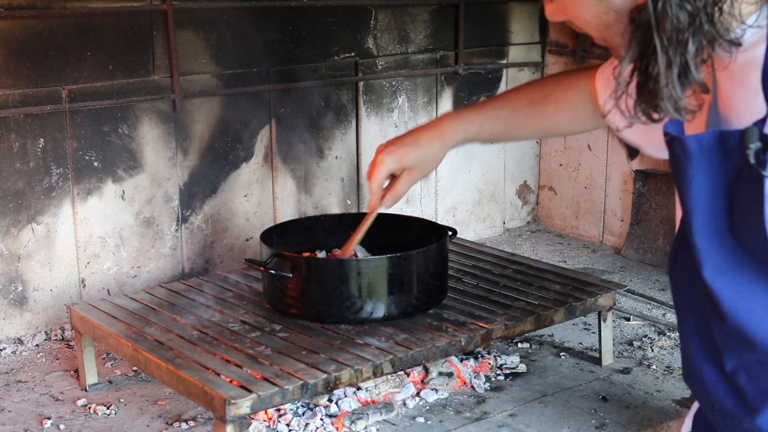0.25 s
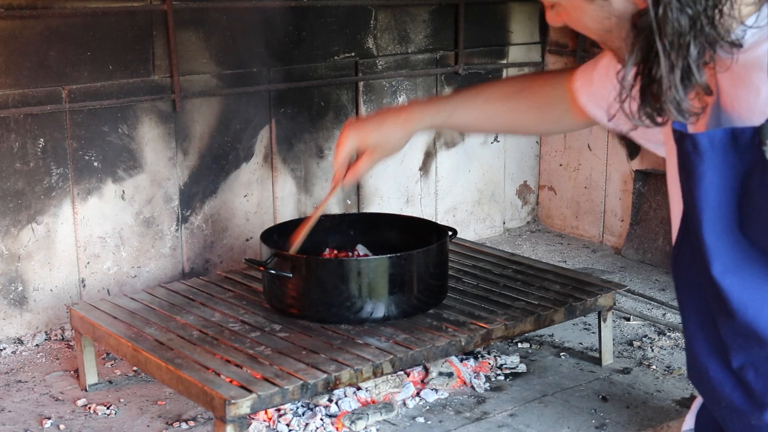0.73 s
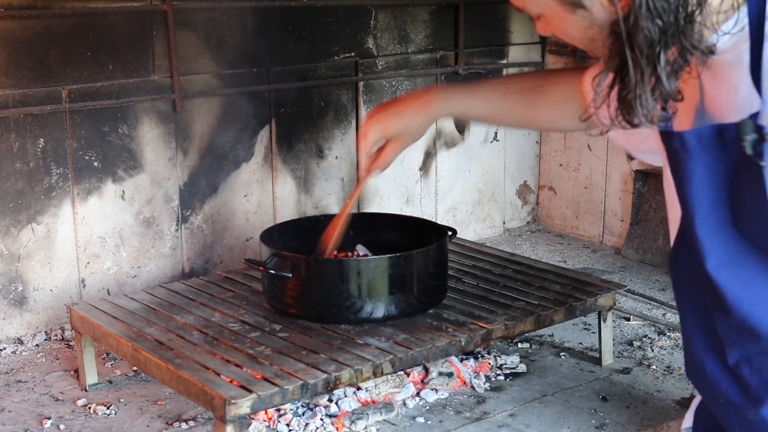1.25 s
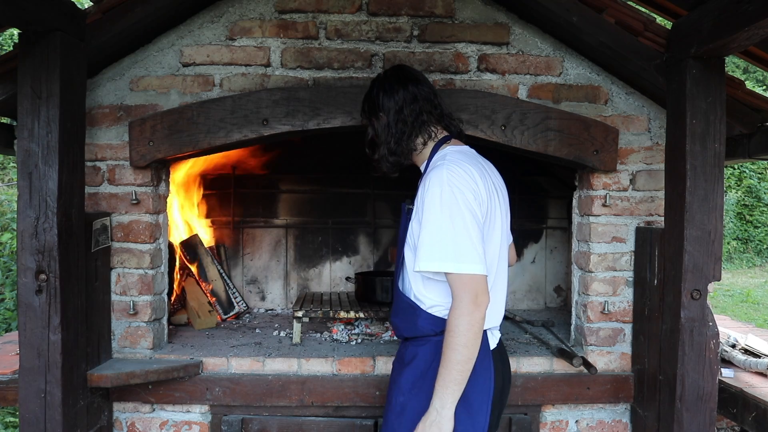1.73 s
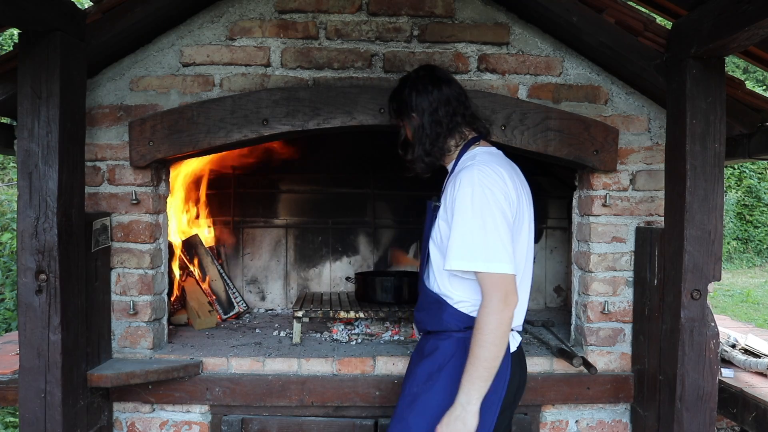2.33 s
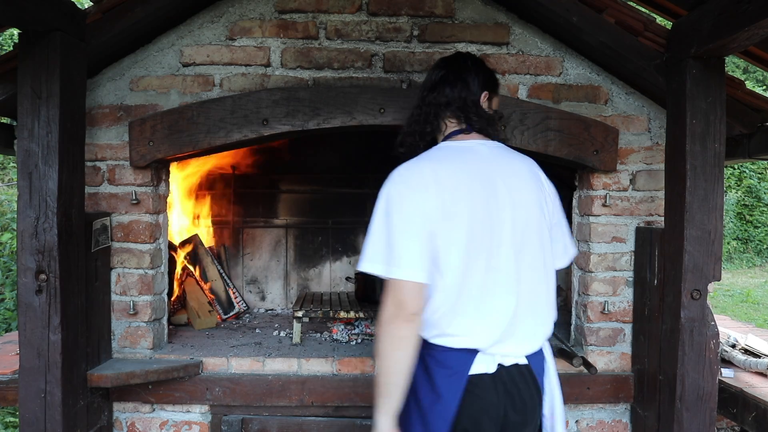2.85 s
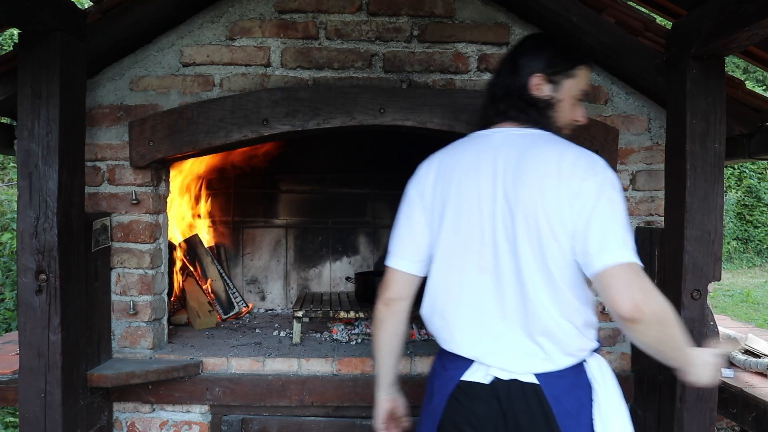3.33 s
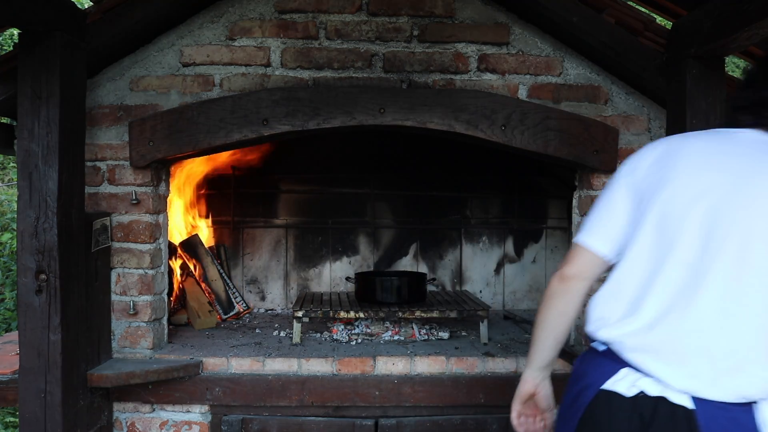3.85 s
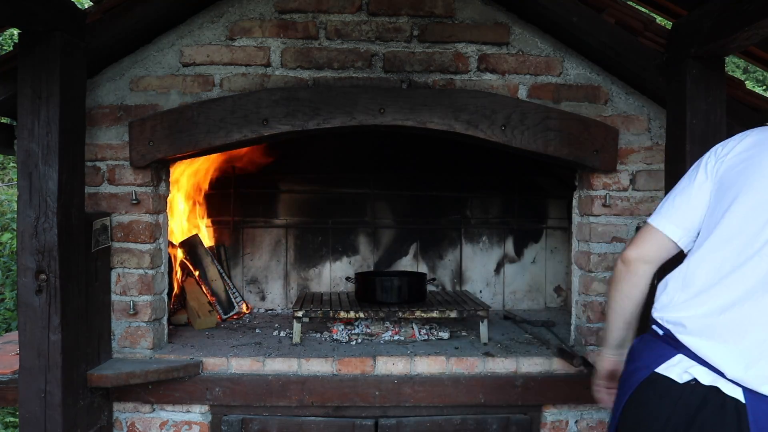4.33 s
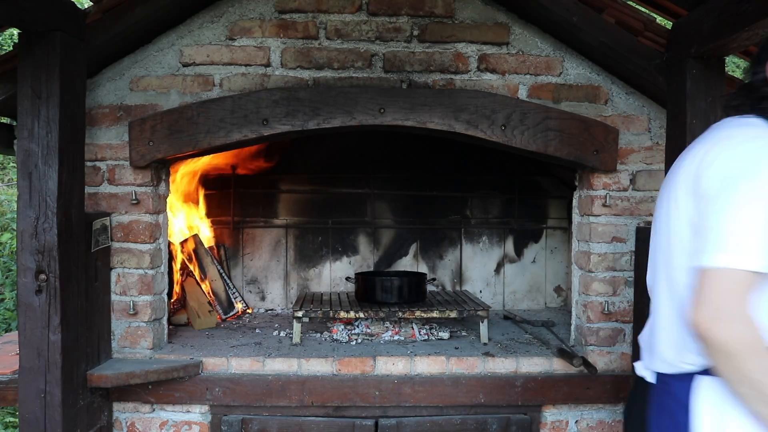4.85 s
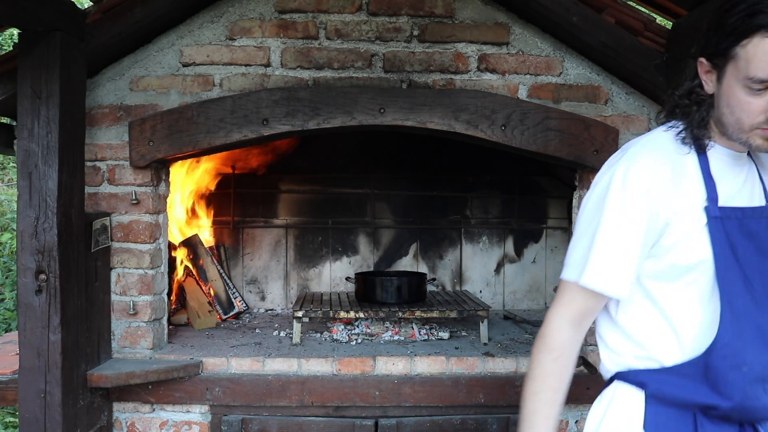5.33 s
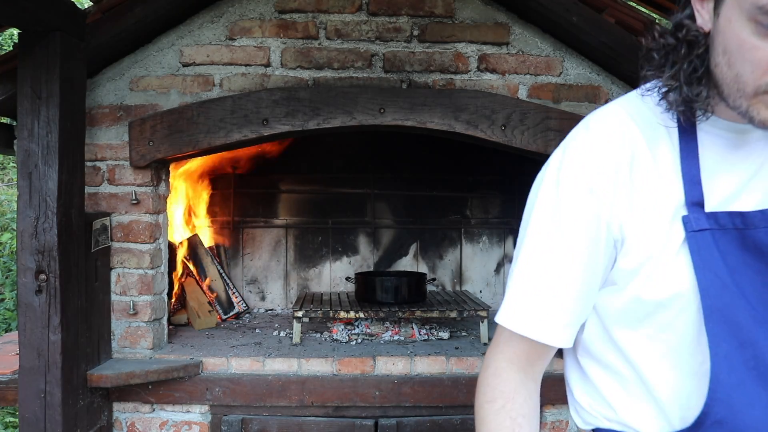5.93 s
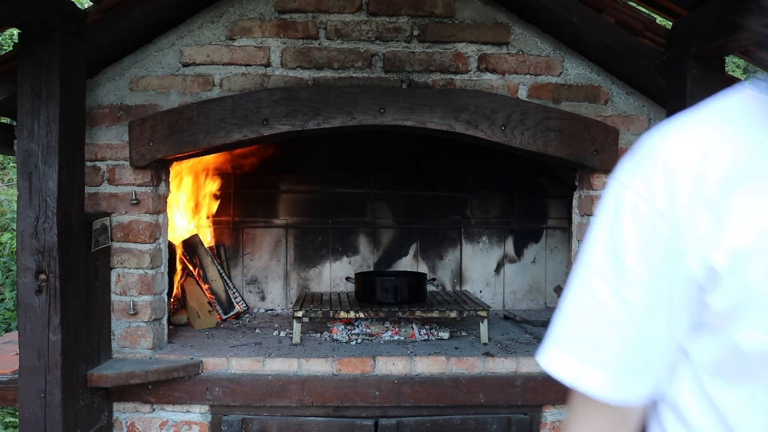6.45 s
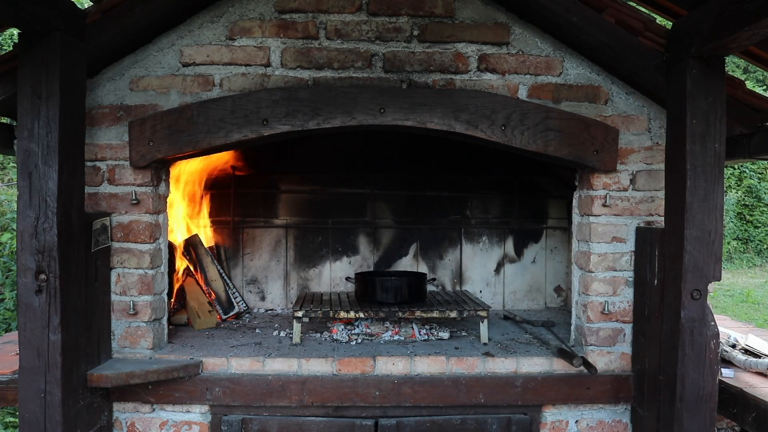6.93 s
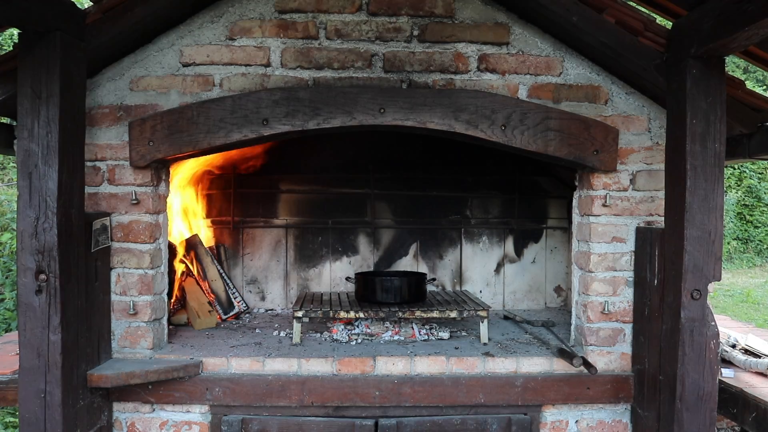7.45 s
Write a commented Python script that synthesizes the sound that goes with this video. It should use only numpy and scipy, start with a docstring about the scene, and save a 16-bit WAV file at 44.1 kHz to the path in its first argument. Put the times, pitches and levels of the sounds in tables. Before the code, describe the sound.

Outdoors at a brick hearth, a quiet wood fire runs throughout: low fluttering rumble, thin ember hiss, fine crackle leaning right. A wooden spoon straight ahead knocks a steel pot at 0.36, 0.68 and 1.0 seconds, hollow with short metallic ringing, each louder and brighter, each with a tiny rebound; a faint dull touch follows at 1.2. Four short rasping scrapes come at 1.7, 2.0, 2.3 and 2.65, with the grate shuddering faintly. Bright snaps stand out near 0.95, 2.15, 3.4 and 7.05, and a steam spit at 3.6. From 3.4 onward dull irregular knocks sound nearby, clearest at 3.6, 6.1 and 6.85. A bird pipes faintly at 0.6, then at 3.9, 4.3 and 4.8, with a slight echo; a tiny chirp comes at 4.6. From 6.1 to the end another bird sings high scoops, a fuzzy note and falling notes.

```python
"""Spoon on a steel pot, outdoor hearth

Straight ahead, a wooden spoon knocks three times on the wall of a steel pot on an iron grate, with a faint
fourth touch, then scrapes four strokes along it. Each blow rings resonant modes; each stroke drives them with
sines and noise. To the right leans a wood fire of filtered noise in a brick hearth, with snaps, spits of steam
and one faint narrow chirp as noise puffs. Dull knocks sound nearby; in the garden one bird pipes and another
sings, as gliding sines."""
import sys
import numpy as np
from scipy import signal
from scipy.fft import rfft, irfft, next_fast_len
from scipy.io import wavfile
from scipy.ndimage import uniform_filter1d, map_coordinates

SR = 44100
rng = np.random.default_rng(int(sys.argv[2]) if len(sys.argv) > 2 else 0)


def store_pcm(level_fs):
    """Save levels as 16-bit WAV."""
    pcm = np.round(np.clip(level_fs, -1, 1) * 32767).astype(np.int16)
    wavfile.write(sys.argv[1], SR, np.atleast_2d(pcm).T)


N = 338639


def amp(db):
    """Gain of a level in dB."""
    return 10 ** (np.asarray(db) / 20)


def unit(x):
    """Scales to rms 1."""
    return x / np.sqrt(np.mean(x ** 2) + 1e-20)


def along(points, hz):
    """Interpolates (Hz, value) points on a log frequency axis."""
    f, v = np.transpose(points)
    return np.interp(np.log(hz + 1), np.log(f + 1), v)


def curves(rows):
    """One value per sample for each column after the time."""
    s, *columns = np.transpose(rows)
    return [np.interp(np.arange(N) / SR, s, column) for column in columns]


def since(s):
    """Seconds since a moment, for every sample."""
    return np.arange(N) / SR - s


def wobble(rate):
    """A smooth random curve with rate knots a second."""
    knots = rng.standard_normal(int(N * rate / SR) + 4)
    return map_coordinates(knots, [np.arange(N) * rate / SR])


def arch(u, sharp):
    """A swell from 0 back to 0 while u runs from 0 to 1."""
    return np.sin(np.pi * np.clip(u, 0, 1)) ** sharp * (u > 0) * (u < 1)


def hump(hz, centre_hz, octaves):
    """A bell-shaped band on a log frequency axis."""
    return np.exp(-.5 * (np.log2((hz + 1) / centre_hz) / octaves) ** 2)


def filtered(x, response):
    """Multiplies the spectrum of x by a response, which may be complex."""
    m = next_fast_len(x.shape[-1] + SR // 2)
    return irfft(rfft(x, m) * response(np.fft.rfftfreq(m, 1 / SR)), m)[..., :x.shape[-1]]


def add(track, s, sound):
    """Lays a sound into a track at s seconds."""
    i = round(s * SR)
    track[..., i:i + sound.shape[-1]] += sound[..., :track.shape[-1] - i]


def sides(pan_db):
    """Left and right gains for a left minus right level."""
    return amp([pan_db / 2, -pan_db / 2])


def whistle(hz, db):
    """A sine of the given rms level along a pitch curve."""
    return np.sqrt(2) * amp(db) * np.sin(2 * np.pi * np.cumsum(hz) / SR)


def patchy(depth_db, channels):
    """White noise with patches of random gain in time and frequency, shared by the channels."""
    z = signal.stft(rng.standard_normal((channels, N)), nperseg=512)[2]
    field = uniform_filter1d(rng.standard_normal(z.shape[1:]), 6, 0)
    field = uniform_filter1d(field, 8, 1)
    return signal.istft(z * amp(depth_db * unit(field)), nperseg=512)[1][:, :N]


def puff(out, s, db, band, shape, pan_db, alike):
    """Adds a short noise in a band under an envelope, from its own side; the microphone dulls the top."""
    dulled = lambda hz: band(hz) / (1 + (hz / 14200) ** 8)
    common, left, right = filtered(shape * rng.standard_normal((3, len(shape))), dulled)
    pair = alike * common + (1 - alike) * np.array([left, right])
    pair *= np.linalg.norm(shape) / np.linalg.norm(pair, axis=1, keepdims=True)
    trim_db = -8.0  # every listed puff level is lowered by this
    add(out, s, amp(db + trim_db) * sides(pan_db)[:, None] * pair)


def bursts(rows, rise_s, t60, alike):
    """Sharp puffs with two coloured bands: a click at the front, then a short fray."""
    out, t = np.zeros((2, N)), np.arange(SR // 10) / SR
    click, fray = amp(-60 * t / 0.008), 0.48 * amp(-60 * t / t60)
    shape = np.minimum(t / rise_s, 1) * (click + fray)
    for s, db, centre_hz, pan_db, octaves, second_hz, second_db in rows:
        band = lambda hz: hump(hz, centre_hz, octaves) + amp(second_db) * hump(hz, second_hz, octaves)
        puff(out, s, db, band, shape, pan_db, alike)
    return out


def swells(rows, low_hz, alike):
    """Band noises that swell and are soon spent, with nothing below low_hz."""
    out, t = np.zeros((2, N)), np.arange(SR // 5) / SR
    for s, db, centre_hz, spent_s, pan_db, octaves, rise_s in rows:
        shape = np.sin(np.pi / 2 * np.minimum(t / rise_s, 1)) * amp(-60 * (t / spent_s) ** 2)
        band = lambda hz: hump(hz, centre_hz, octaves) * (hz > low_hz)
        puff(out, s, db, band, shape, pan_db, alike)
    return out


# the brick vault's decay: f/Hz, t60/s
VAULT_DECAY = [(300, 0.19), (3000, 0.18), (12000, 0.072)]


def hearth(x):
    """The brick vault's short tail: decaying noise in which each frequency dies at its own speed."""
    hz, t, z = signal.stft(rng.standard_normal((2, SR // 4)), SR, nperseg=256)
    decay = amp(-60 * t / along(VAULT_DECAY, hz)[:, None])
    tail = signal.istft(z * decay, SR, nperseg=256)[1]
    return signal.fftconvolve(np.atleast_2d(x), tail / np.linalg.norm(tail[0]), axes=1)[:, :N]


# the fire's course: t/s, rumble level/dB, roar level/dB (before the flicker)
FIRE_LEVELS = [(0.0, -76, -68.5), (0.23, -64.5, -69.5), (0.58, -81.5, -69.5), (0.88, -68.5, -65.5),
               (1.22, -63.5, -66), (2.01, -74.5, -67.5), (2.61, -72.5, -68), (3.42, -79, -69.5),
               (4.06, -76, -69.5), (4.5, -79.5, -68.5), (7.68, -77.5, -68)]
# colours of flames and embers: f/Hz, relative level/dB per Hz
RUMBLE_COLOUR = [(12, -54), (20, -18.5), (48, 8), (65, 5.5), (86, -17.5), (100, -11), (130, -59),
                 (220, -120)]
ROAR_COLOUR = [(53, -29), (90, -2.5), (162, 1.5), (320, 0), (477, -7), (767, -13.5), (858, -14),
               (1340, -18), (2780, -24), (4000, -47), (5200, -71), (8800, -120)]
HISS_COLOUR = [(1470, -40), (2500, -8.5), (2790, -5), (3830, -6.5), (4100, -5.5), (4720, -8), (9460, -6),
               (12400, -16), (15900, -19)]
# stereo width of the fire bed: f/Hz, side minus mid level/dB
FIRE_WIDTH = [(60, -27.5), (110, -20), (200, -17.5), (380, -12.5), (700, -9.5), (1290, -4.5), (2380, -4.5),
              (4400, -3.5), (8120, -1), (15000, 0.5)]


def fire_bed():
    """Flames rumble and flutter in the bass, flaring together; embers hiss, wider in the treble."""
    def pair(colour, depth_db):
        mid_side = lambda hz: amp(along(colour, hz)) * np.array([np.ones_like(hz), amp(along(FIRE_WIDTH, hz))])
        mid, side = filtered(patchy(depth_db, channels=2), mid_side)
        return np.array([mid + side, mid - side]) / np.std(mid)

    rumble_db, roar_db = curves(FIRE_LEVELS)
    hiss_db = -79.5 - 0.31 * since(0)  # the embers cool, in dB per second
    flare = wobble(12)
    rumble = amp(rumble_db + 0.5 * flare + 0.32 * wobble(2.9)) * pair(RUMBLE_COLOUR, depth_db=3.0)
    roar = amp(roar_db + .9 * flare + 1.1 * wobble(22)) * pair(ROAR_COLOUR, depth_db=.8)
    hiss = amp(hiss_db + 1.2 * wobble(35)) * pair(HISS_COLOUR, depth_db=.5)
    return rumble + roar + hiss * sides(-1.5)[:, None]


# piping bird: t/s, length/s, f/Hz, level/dB before the droop, half-pitch undertone over the note/dB
PIPED_NOTES = [(0.565, 0.082, 1670, -70.5, -40), (3.867, 0.097, 1830, -63.5, -40),
               (4.308, 0.1, 1850, -65, -6.5), (4.778, 0.11, 1842, -62.5, -40)]


def piping_bird():
    """A bird pipes level sine notes that droop and fade at the end; a far wall returns them."""
    bend, bend_power, fade_db = .09, 3.5, 24  # fall as a share of pitch; how late; level lost with it
    piper = np.zeros(N)
    for s, length, pitch_hz, db, under_db in PIPED_NOTES:
        u = since(s) / length
        droop = np.clip(u, 0, 1) ** bend_power
        hz = pitch_hz * (1 - bend * droop) + 15 * wobble(80)
        level_db = db - fade_db * droop + 2.4 * wobble(70)
        note = arch(u, sharp=0.38) * whistle(hz, level_db)
        undertone = arch(u, sharp=3) * whistle(hz / 2, db + under_db)
        piper += note + undertone
    return piper + amp(-12.5) * np.roll(piper, round(.075 * SR))  # the wall's echo after 75 ms


# sung notes: t/s, length/s, start f/Hz, middle f/Hz, end f/Hz, level/dB before the wobble
SUNG_NOTES = [(6.066, 0.13, 3930, 3590, 3990, -79), (6.342, 0.14, 3940, 3600, 4000, -74),
              (6.611, 0.19, 3910, 3120, 3960, -68.5), (6.916, 0.13, 5200, 5050, 5500, -79),
              (7.2, .045, 5200, 4950, 4650, -81), (7.277, 0.073, 4120, 3480, 2880, -72.5),
              (7.448, 0.11, 3600, 2900, 2260, -69.5)]
# one fuzzy note: t/s, length/s, f/Hz, level/dB
FUZZY_NOTE = [(6.765, .18, 2880, -76.5)]


def singing_bird():
    """A bird sings scoops and falls as smooth sine arcs, and one fuzzy note of narrow noise."""
    singer = np.zeros(N)
    for s, length, start_hz, middle_hz, end_hz, db in SUNG_NOTES:
        u = since(s) / length
        v = np.clip(u, 0, 1)
        bow_hz = middle_hz - (start_hz + end_hz) / 2
        hz = start_hz + (end_hz - start_hz) * v + bow_hz * np.sin(np.pi * v ** .85) ** 1.4
        singer += arch(u, sharp=.45) * whistle(hz + 30 * wobble(150), db + 4 * wobble(60))
    (s, length, fuzzy_hz, db), = FUZZY_NOTE
    narrow = unit(filtered(rng.standard_normal(N), lambda hz: hump(hz, fuzzy_hz, 0.052)))
    return singer + arch(since(s) / length, sharp=0.94) * amp(db) * narrow


# dull knocks nearby: t/s, level/dB before the puff trim, centre f/Hz, left minus right/dB,
# width/octaves, second centre f/Hz, second over first/dB
NEARBY_KNOCKS = [(3.434, -51, 514, 4, 0.39, 1340, -10), (3.634, -37.5, 875, -.6, 0.24, 1760, 2.5),
                 (3.9, -47.5, 362, -1.2, 0.7, 1810, -16.5), (4.45, -51, 487, -2.2, 0.44, 1440, -17),
                 (4.581, -50, 479, 1, 0.6, 1800, -19), (5.318, -50, 324, 0, 1.1, 2860, -36),
                 (5.505, -50, 463, -2, 0.7, 1470, -14), (5.56, -52.5, 870, -1.2, 0.21, 2460, -16),
                 (6.066, -42.5, 371, 1, 0.88, 1610, -38), (6.331, -47.5, 930, 5, 0.28, 2270, -3),
                 (6.607, -48.5, 358, -2, 0.52, 1280, -22), (6.852, -40, 301, 2, 1.32, 2890, -41),
                 (7.319, -51, 345, .1, 0.65, 1900, -8)]


def thuds():
    """Things knocked nearby: short low noise bursts in two bands."""
    return bursts(NEARBY_KNOCKS, rise_s=0.0015, t60=0.078, alike=0.9)


def crackle(count, floor_db, low_hz, top_hz, t60):
    """Many faint snaps at random moments, mostly to the right, a few of them larger."""
    when, size, pitch, low, pan = rng.random((count, 5)).T
    same = np.ones(count)
    start_s = when * (N / SR - .01)
    level_db = floor_db - 2.7 * np.log(size + 0.014)
    centre_hz, second_hz = top_hz * (.6 + .4 * pitch), low_hz * (1 + 1.5 * low)
    pan_db = -7 * pan + 1.5
    rows = np.transpose([start_s, level_db, centre_hz, pan_db, .3 * same, second_hz, -5 * same])
    return bursts(rows, 0.0006, t60, alike=0.67)


def embers():
    """Charcoal settles with duller ticks, scattered at random."""
    return crackle(count=45, floor_db=-63.5, low_hz=500, top_hz=4000, t60=0.088)


# louder snaps of burning wood: t/s, level/dB before the puff trim, centre f/Hz, left minus right/dB,
# width/octaves, second centre f/Hz, second over first/dB
LOUD_SNAPS = [(0.387, -51.5, 10000, -2, 0.31, 5800, 9), (0.5023, -61, 8730, -2.5, 0.23, 6730, 6),
              (0.6128, -53.5, 10300, -3, 0.22, 6600, 11), (0.7647, -52.5, 8120, 2, 0.25, 4250, 2),
              (0.7816, -49.5, 10900, -10, 0.37, 4400, -15), (0.794, -46.5, 14500, -14, 0.12, 10800, -5),
              (0.7437, -57, 10000, -6, 0.15, 4500, -6), (0.8879, -51, 8560, -2, 0.53, 2910, -2),
              (0.9453, -32, 10700, -14.5, 0.13, 6800, -20.5), (1.2126, -52.5, 8850, -4, 0.22, 4480, -6),
              (1.5319, -55, 9200, -4, 0.27, 6800, 5), (2.153, -30, 11200, -1.5, 0.11, 3560, -39),
              (2.5461, -50, 12100, -5, 0.24, 7010, -2), (2.5905, -52, 12200, -1.5, 0.27, 7050, -15),
              (3.0619, -56, 9230, -1, 0.3, 4740, -15), (3.3712, -32, 12640, -7, 0.074, 8530, -1.5),
              (3.3735, -42, 10500, -4, 0.25, 3360, 0), (3.523, -52.5, 8180, -2.5, 0.6, 5950, -6),
              (3.5433, -50, 13500, 7, 0.08, 11000, -7), (3.7299, -52.5, 13400, 0, 0.23, 6570, -11),
              (3.886, -50, 9000, -2.5, 0.47, 6190, -5), (4.0654, -51.5, 8700, -1, 0.42, 6490, -2),
              (4.686, -58, 9000, -1.5, 0.51, 6230, -6), (4.7177, -56, 12800, -1.5, 0.62, 3150, 4),
              (5.7119, -57.5, 9100, -8, 0.43, 6580, 2.5), (5.7384, -50, 9800, -2.5, 0.52, 3060, -5),
              (5.896, -52, 9100, -12, 0.58, 6410, -6), (5.9202, -46, 12600, -2, 0.31, 6130, -9),
              (5.9388, -48, 11800, -5, 0.45, 6540, -5), (5.9732, -53, 9500, 1, 0.59, 2860, 1),
              (6.1362, -53, 9300, -2.5, 0.35, 3600, -9), (6.1867, -54, 9000, -2.5, 0.36, 4000, -18),
              (7.0453, -35.5, 8750, -1, 0.11, 11200, 2)]


def wood_snaps():
    """Burning wood snaps: sharp bright noise bursts over a random faint crackle."""
    loud = bursts(LOUD_SNAPS, rise_s=0.00052, t60=0.036, alike=0.34)
    return loud + crackle(count=130, floor_db=-66, low_hz=2980, top_hz=12100, t60=0.024)


# spits of steam, and one faint narrow chirp at 4.6 s: t/s, level/dB before the puff trim, centre f/Hz,
# spent after/s, left minus right/dB, width/octaves, rise/s
SPITS_AND_CHIRP = [(0.681, -55, 6800, .06, -4, .35, .004), (6.1, -61.5, 8500, 0.063, -7, .4, .005),
                   (4.6, -63, 4200, 0.065, .1, 0.045, .006), (0.703, -48.5, 6850, 0.064, -1, 0.35, 0.0029),
                   (1.021, -47, 8800, 0.085, -2.5, 0.75, 0.003), (1.13, -51, 3900, 0.069, -1, 0.19, .004),
                   (1.131, -54, 7800, 0.039, 0, 0.22, 0.0037), (1.341, -49.5, 5300, 0.026, -2, 0.7, 0.0047),
                   (3.604, -34.5, 7250, 0.084, -3.5, 0.63, 0.031),
                   (3.979, -66, 8700, .08, -10, 0.3, 0.0065), (4.595, -60, 7700, 0.1, -5, 2.4, .006),
                   (6.295, -51.5, 8700, 0.098, -4, 0.89, 0.0088)]


def spits_and_chirp():
    """Spits of steam, and one faint narrow chirp at 4.6 s: brief swelling noise bands."""
    return swells(SPITS_AND_CHIRP, low_hz=2300, alike=0.43)


# strokes of the spoon: first touch t/s, touch level/dB, rise/s, bite level/dB, slide level/dB, slide fade/dB per s,
# lift after/s, lift fade/dB per s, hum while sliding/dB (each voice shifts bite, slide and fade)
SPOON_STROKES = [(1.6803, -37.5, .013, -36, -44, 130, 0.12, 303, -20),
                 (2.0202, -43, 0.022, -36.5, -42.5, 62, 0.17, 260, -18),
                 (2.3276, -39, 0.017, -37, -39, 122, 0.15, 260, -13.5),
                 (2.6567, -36.5, 0.014, -36.5, -46.5, 34, 0.14, 189, -3)]


def pressure(over_bite_db, bite_dies, over_slide_db, fades_faster, hums=False):
    """Gain of one voice: the spoon bites in, slides on while it slows, and lifts off (fades in dB per s)."""
    rise_db = 38.5  # how far under its peak a stroke sets out
    power = np.zeros(N)
    for s, _, rise_s, bite_db, slide_db, fades, lift_s, lifts, hum_db in SPOON_STROKES:
        t = since(s)
        after, lifted = np.maximum(t - rise_s, 0), np.maximum(t - lift_s, 0)
        bite = amp(bite_db + over_bite_db - bite_dies * after)
        fade_db = (fades + fades_faster) * after + (lifts - fades) * lifted
        slide = amp(slide_db + over_slide_db + hums * hum_db - fade_db)
        rise = (t > 0) * amp(-rise_db * np.clip(1 - t / rise_s, 0, 1) ** 2)
        power += rise ** 2 * (bite ** 2 + slide ** 2)
    return np.sqrt(power)


def grate():
    """The iron grate under the pot shudders with each stroke, as low band noise."""
    shudder = unit(filtered(rng.standard_normal(N), lambda hz: hump(hz, 203, 0.81)))
    return pressure(-25, 300, -16, 2) * shudder


# short narrow rings and catches on the pot wall, one with the first knock, the rest in the strokes:
# t/s, level/dB before the puff trim, centre f/Hz, spent after/s, left minus right/dB, width/octaves, rise/s
WALL_RINGS_AND_CATCHES = [(.358, -56, 4220, 0.049, 2, 0.053, .002),
                          (1.768, -52, 3820, 0.11, -1, 0.13, 0.011),
                          (2.14, -48.5, 4800, 0.12, 1, .7, 0.016), (2.43, -50, 2600, .07, 0.1, .5, .01),
                          (2.73, -47, 3370, 0.03, 0, .2, 0.0044),
                          (2.769, -40.5, 3300, 0.04, -0.5, 0.28, 0.0046),
                          (2.832, -54.5, 3800, 0.051, 0, 0.077, 0.0065),
                          (2.836, -57, 1580, 0.081, -1, .12, 0.0049)]


def wall_rings_and_catches():
    """Short narrow rings and catches on the pot wall: one with the first knock, the rest in the strokes."""
    return swells(WALL_RINGS_AND_CATCHES, low_hz=0, alike=1)


# modes of the pot: f/Hz, level/dB before the contact's spread, t60/s
POT_MODES = [(386.5, 3.5, 0.087), (516, -9, 0.085), (471.5, -14, 0.31), (612.6, 8.5, 0.023),
             (735, -3, 0.056), (800.4, -1.5, 0.025), (1014, -14, 0.1), (1114, -7, 0.059),
             (1178, -7.5, 0.042), (1386, -11.5, 0.042), (1485, -13.5, 0.085), (1497, -17, 0.13),
             (1686, -8, 0.089), (1927, -4.5, 0.046), (1950, -15.5, 0.16), (2155, -17, 0.075),
             (2480, -23, 0.022), (2516, -11, 0.028), (2880, -24, 0.093), (3120, -13.5, 0.14),
             (3500, -24, 0.098), (3680, -7, 0.17), (4010, -10, 0.067), (4250, -1, 0.046)]


def modes(hz, low_hz, top_hz, spread_db):
    """The pot's response: a causal resonance per mode, its strength varied at random by each contact's spread."""
    total = 0
    luck = rng.standard_normal(len(POT_MODES))
    for k, (centre_hz, db, t60) in enumerate(POT_MODES):
        width = np.log(1000) / (np.pi * t60)
        peak = 1j * hz / (centre_hz ** 2 - hz * hz + 1j * hz * width)
        gain = amp(db + spread_db * luck[k]) * (low_hz < centre_hz < top_hz)
        total = total + (-1) ** k * gain * peak  # neighbours swing opposite
    return total


# colours of fine slips, dull and bright: f/Hz, relative level/dB per Hz
RASP_COLOUR = [(410, -16), (700, -11), (823, -12.5), (1060, -10.5), (1390, -10), (2330, -6.5),
               (6000, -16.5), (7800, -21.5), (13200, -120)]
BRIGHT_COLOUR = [(2940, -68), (5000, -11), (9040, -8.5), (10200, -15), (11100, -18), (15800, -28.5)]


def strokes():
    """Wood dragged on steel: the push swings the two lowest modes, the drag rings the next, fine slips rasp."""
    slips = patchy(1.5, channels=3) * amp(2.5 * wobble(250) + 2.2 * wobble(45))
    drag = unit(filtered(slips[0], lambda hz: modes(hz, 475, 800, spread_db=0)))
    # the rasp's colour less the outline of the modes, so that the ringing follows the colour
    mode_outline = [mode[:2] for mode in sorted(POT_MODES)]
    level = lambda hz: amp(along(RASP_COLOUR, hz) - along(mode_outline, hz))
    ringing = unit(filtered(slips[1], lambda hz: level(hz) * modes(hz, 800, 9000, spread_db=0)))
    plain = unit(filtered(slips[1], lambda hz: amp(along(RASP_COLOUR, hz))))
    rasp = unit(0.72 * ringing + plain)
    bright = unit(filtered(slips[2], lambda hz: amp(along(BRIGHT_COLOUR, hz))))
    swing = whistle(POT_MODES[0][0] + 16 * wobble(60), 1.5 * wobble(40))
    hum = whistle(POT_MODES[2][0] + 6 * wobble(30), 4.5 * wobble(70))
    out = pressure(3.5, 520, -8.5, 35) * swing
    out += pressure(-10.5, 252, -0.5, -8, hums=True) * hum
    out += pressure(-7.5, 350, -8.5, -11) * drag
    out += pressure(-2.5, 342, -0.24, 17) * rasp
    out += pressure(-11, 405, -11.5, 27) * bright
    return out


def touches():
    """The spoon's first touch of each stroke: a short, softened noise tick."""
    out, t = np.zeros(N), np.arange(SR // 2) / SR
    for s, db, *_ in SPOON_STROKES:
        tick = amp(-60 * t / 0.015) * rng.standard_normal(len(t))
        add(out, s, amp(db) * filtered(tick, lambda hz: 1 / (1 + 1j * hz / 4000) ** 2))
    return out


# blows of the spoon: t/s, ring level/dB, hardness as upper edge f/Hz, rebound over the blow/dB
SPOON_BLOWS = [(0.3599, -28, 1840, -6), (0.6793, -24, 4400, -2), (1.0088, -20, 4800, -5),
               (1.182, -42, 750, -19)]
# the spoon's own dense, dead clack: f/Hz, relative level/dB per Hz
CLACK_COLOUR = [(190, -40), (330, -4.5), (469, -8), (820, -28), (972, -25), (1520, -11), (2790, -23.5),
                (3150, -12), (6000, -42), (7800, -78), (13200, -120)]


def knocks():
    """Soft wooden blows: longer contact leaves high modes unstruck; the spoon clacks and rebounds once."""
    rebound_s, rebound_softer = .0115, 0.87  # delay; its upper edge over that of the blow
    out, t = np.zeros(N), np.arange(SR // 2) / SR
    onset = 1 - np.exp(-(t / 0.0004) ** 2)
    contacts = []
    for s, db, edge_hz, rebound_db in SPOON_BLOWS:
        contacts.append((s, db, edge_hz, -3))  # last: clack over the ring, in dB
        contacts.append((s + rebound_s, db + rebound_db, edge_hz * rebound_softer, -9.5))
    for s, db, edge_hz, clack_db in contacts:
        edge = signal.butter(8, edge_hz, analog=True)
        soft = lambda hz: (signal.freqs(*edge, worN=hz)[1] + amp(-35.0)) / (1 + 1j * hz / 3800) ** 4
        impulse = 1. * (t == 0)
        ring = filtered(impulse, lambda hz: soft(hz) * modes(hz, 0, 9000, spread_db=2))
        dying = (1 - np.exp(-t / 0.002)) * amp(-60 * t / 0.061)
        clack_noise = dying * rng.standard_normal(len(t))
        clack = filtered(clack_noise, lambda hz: soft(hz) * amp(along(CLACK_COLOUR, hz)))
        clack *= np.linalg.norm(dying) / np.linalg.norm(clack)
        add(out, s, amp(db) * onset * (ring / np.abs(ring).max() + amp(clack_db) * clack))
    return out


def radiated(x):
    """The pot is too small to send out much below its first mode: a steep low cut."""
    return signal.sosfilt(signal.ellip(6, 1, 45, 355, "high", fs=SR, output="sos"), x)


def scene():
    """The pot sits straight ahead; the fire spreads to the right; the hearth answers."""
    fire = fire_bed()
    calls = piping_bird() + singing_bird()
    dull = thuds() + embers()
    snaps = wood_snaps()
    blows = knocks() + touches()
    pot = radiated(blows + amp(-11.5) * hearth(blows)[0] + strokes()) + wall_rings_and_catches() + grate()
    vault = amp(-5) * hearth(snaps) + amp(-14) * hearth(dull) + amp(-20.5) * hearth(calls)
    return fire + calls + dull + snaps + spits_and_chirp() + pot + vault


def record(dry):
    """The microphone's channel keeps nothing above its band limit."""
    return filtered(dry, lambda hz: hz < 15900)


dry = scene()
out = record(dry)
store_pcm(out)
```